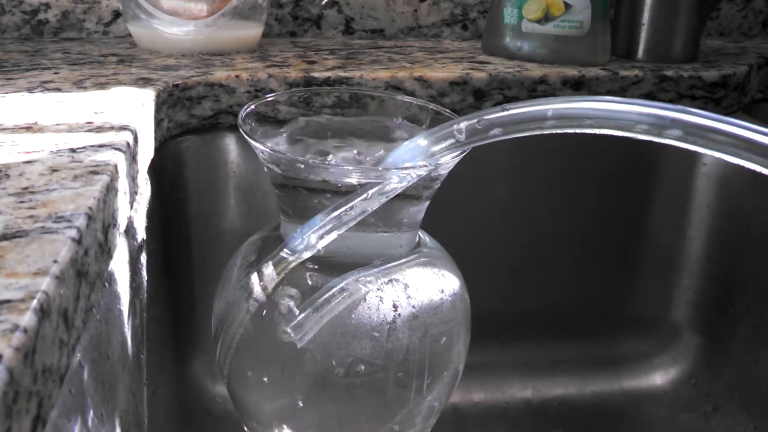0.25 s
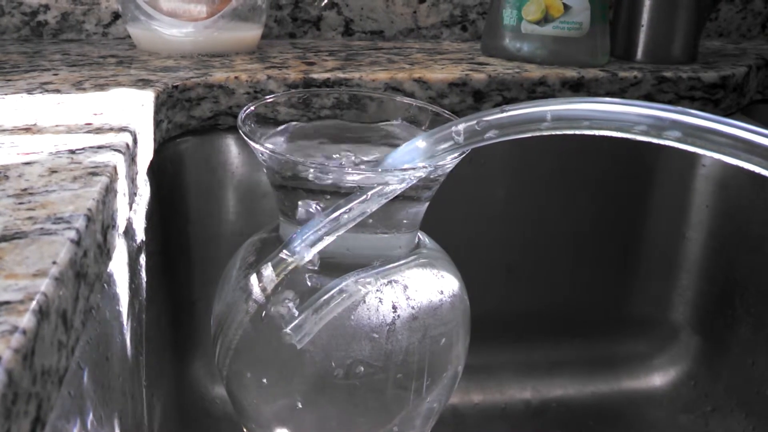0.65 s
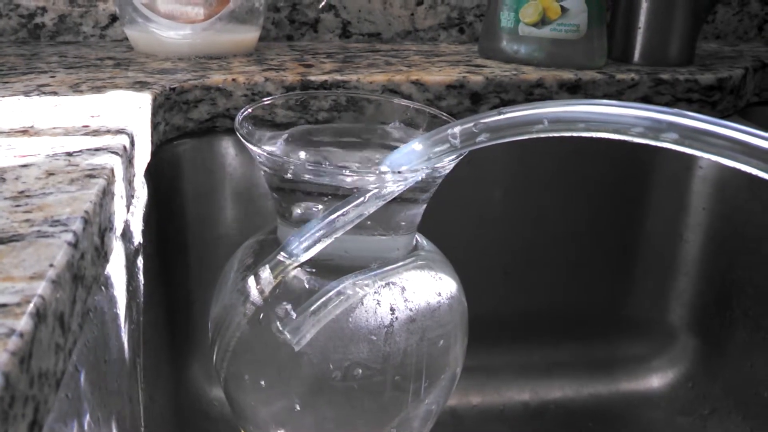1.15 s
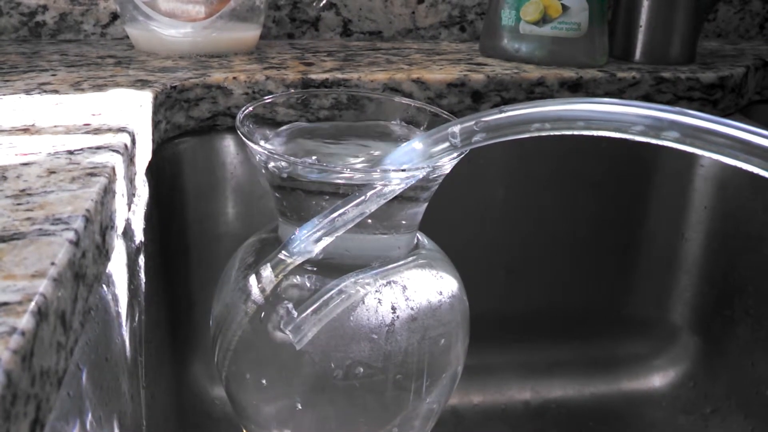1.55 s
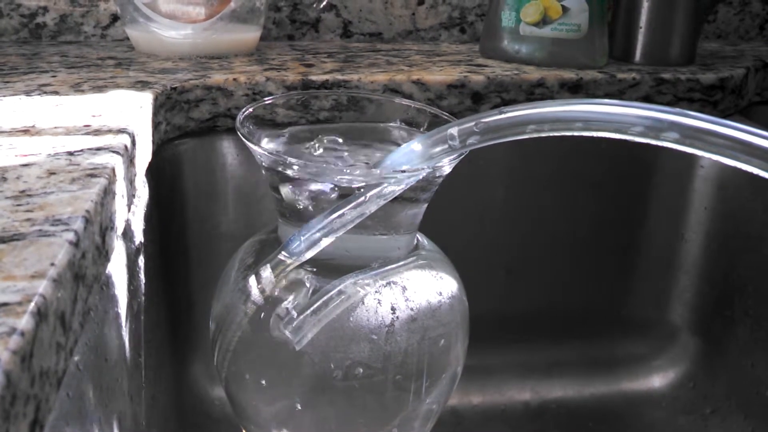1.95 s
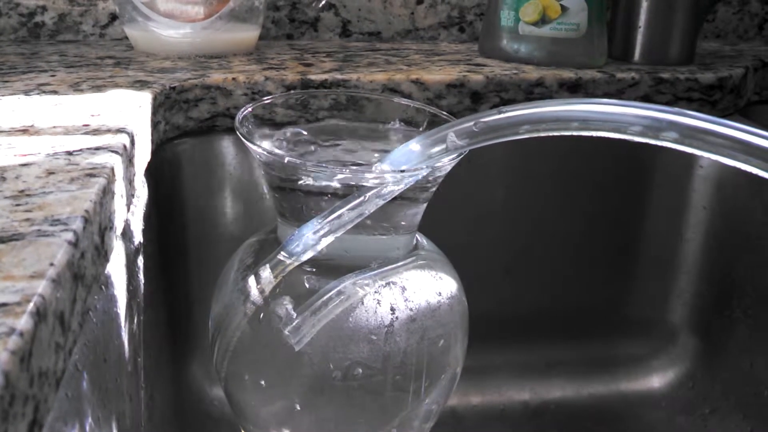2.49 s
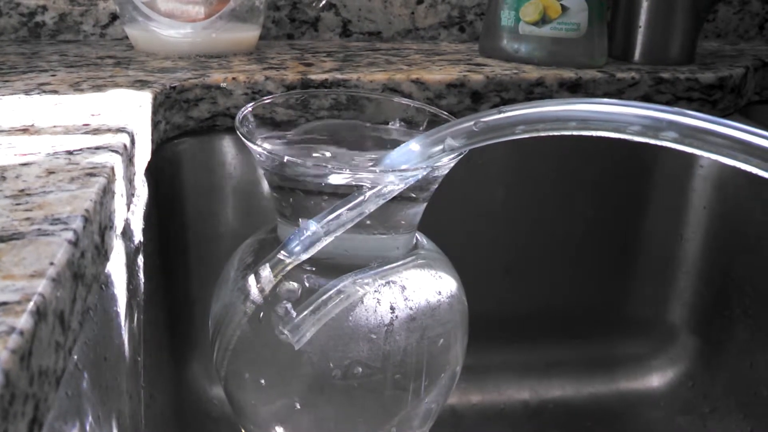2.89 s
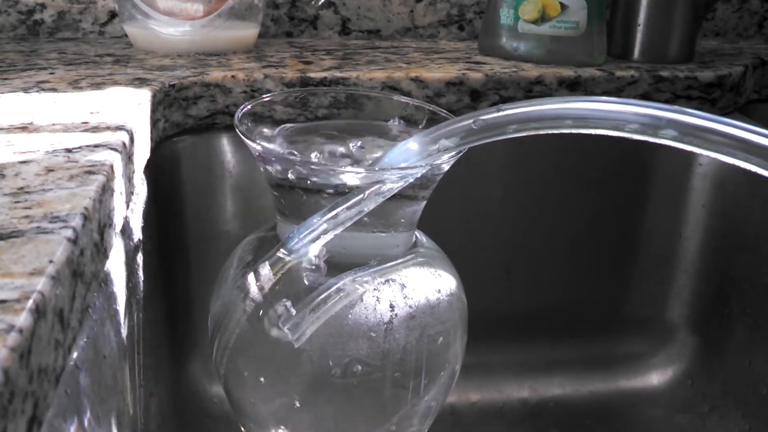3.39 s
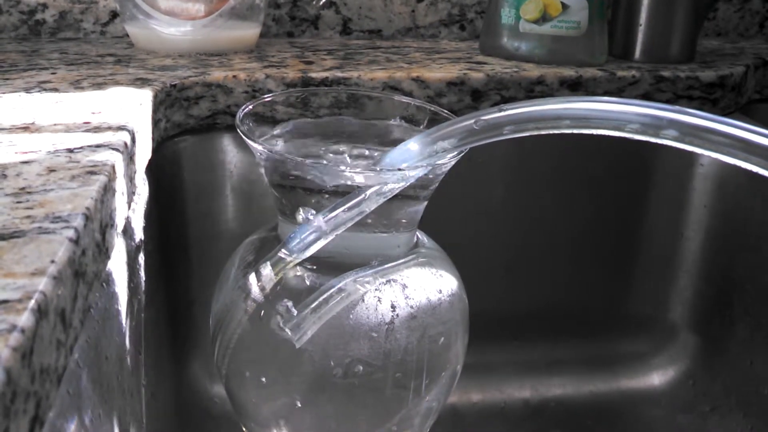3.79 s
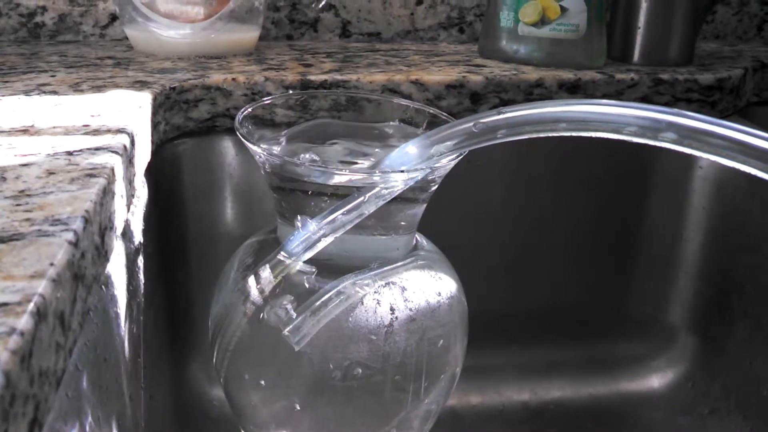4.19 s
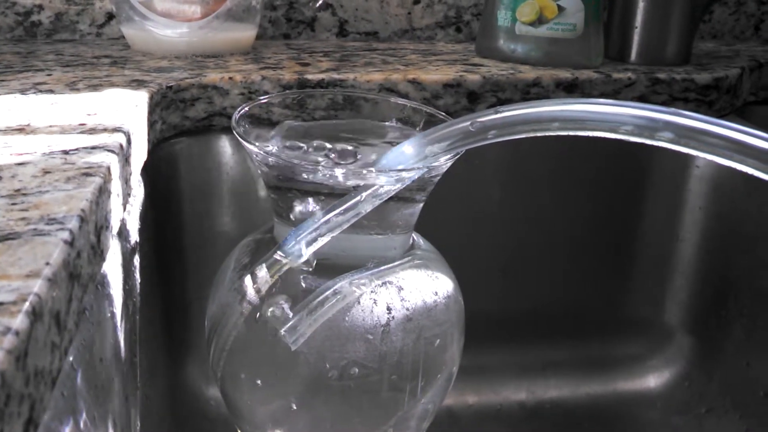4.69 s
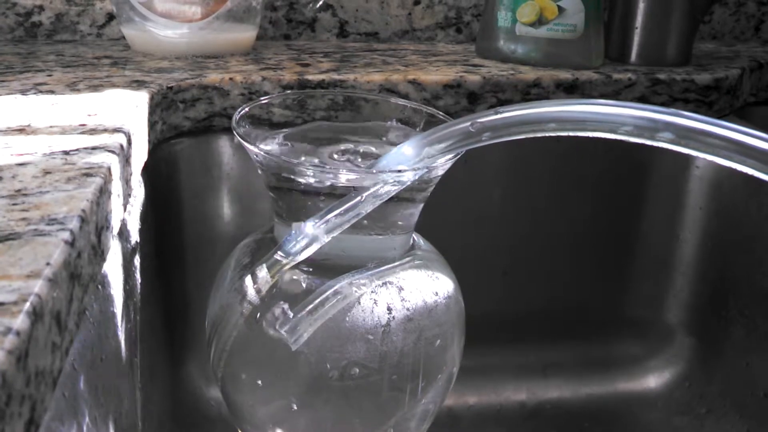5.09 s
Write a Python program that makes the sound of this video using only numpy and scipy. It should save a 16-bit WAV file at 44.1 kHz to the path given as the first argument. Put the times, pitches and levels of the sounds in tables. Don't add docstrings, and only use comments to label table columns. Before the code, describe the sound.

The sound opens quietly and rises evenly to full level by about 1.8 seconds, then stays constant to the end near 5.5 seconds. A bass-heavy appliance drone dominates, centred around 118 Hz and throbbing about four times a second, with a mid whirr near 500 Hz and a soft, dark fan roar. Over it, gas bubbles burst in a water-filled glass vase: very short, dry, bright ticks with a wet, glassy edge and a brief steel-basin ring. Faint pops come at 0.15, 0.3, 0.6, 0.9 and 1.2 seconds. Busy clusters follow at 2.0 to 2.35, a strong click at 2.8, another cluster at 3.3 to 3.4 with a lower plip, and sharp pops at 3.6 to 4.0, the strongest near 3.8. Isolated ticks fall at 4.4 and 5.0; then only the drone remains. Close stereo microphone, pops left of centre, slight hiss.

```python
import sys
import numpy as np
from scipy import signal
from scipy.io import wavfile
from scipy.ndimage import uniform_filter1d

SR = 44100
rng = np.random.default_rng(int(sys.argv[2]) if len(sys.argv) > 2 else 0)


def volts_from_db(level):
    exponent = np.asarray(level, float) / 20
    return 10 ** exponent


def waveform_to_disk(signal):
    frames = np.transpose(np.atleast_2d(signal))
    scaled = np.clip(frames, -1, 1) * 32767
    samples = np.round(scaled).astype(np.int16)
    wavfile.write(sys.argv[1], SR, samples)


N = 235658


def evened(x):
    return x / np.sqrt(np.mean(x ** 2) + 1e-20)


def read(points, hz):
    f, *columns = np.transpose(points)
    return [np.interp(np.log(hz + 1), np.log(f + 1), c) for c in columns]


def drift(top_hz, count):
    t = np.arange(N // 256 + 2) * 256 / SR
    hz = np.geomspace(0.1, top_hz, num=16)[:, None]
    turns = rng.random((count, len(hz), 1))
    sines = np.sin(2 * np.pi * (hz * t + turns)) / np.sqrt(hz)
    slow = evened(sines.sum(1))
    return np.array([np.interp(np.arange(N) / SR, t, row) for row in slow])


def late(x, count):
    silence = np.zeros(x.shape[:-1] + (count,))
    return np.concatenate([silence, x[..., :-count]], axis=-1)


def ports(common, difference):
    return np.array([common + difference, common - difference])


SHAFT_HZ, PUMP_HZ, BUZZ_HZ, BLADE_HZ = 58.92, 115.61, 120.05, 508.67
# multiple of the fundamental, level in dB common to
# both ports, port difference in dB relative to it, phase of the difference in rad.
SHAFT_TONES = [(1, -38.0, -15.5, -0.25), (5, -47.4, -14.5, 2.92), (6, -37.5, -24.2, 1.48),
               (7, -46.3, -21.3, -1.0), (63, -80.0, -3.4, -0.95), (64, -85.2, 0.2, -1.76),
               (65, -85.6, -10.1, 2.77), (98, -77.6, 3.6, -0.94), (100, -89.0, -0.6, -1.15),
               (113, -87.9, -10.9, -1.5), (141, -89.3, -1.0, -1.45), (212, -91.1, -15.0, 2.73),
               (214, -90.8, -9.6, 2.05), (215, -89.6, -0.1, 2.85)]
PUMP_TONES = [(1, -30.5, -17.3, 0.07), (2, -50.4, -9.8, -0.23), (3, -51.7, -14.7, -1.26)]
BUZZ_TONES = [(1, -34.2, -17.9, -0.27), (2, -49.8, -15.7, -2.79), (3, -52.9, -6.9, -0.24)]
# multiple of the blade rate, buzz sideband number, level in dB,
# port difference in dB, phase of the difference in rad.
BLADE_TONES = [(1, -1, -45.0, -16.4, 1.71), (1, 0, -31.1, -12.8, -0.22), (1, 1, -56.3, -14.2, -2.66),
               (1, 2, -52.6, -6.1, -0.67), (2, -1, -64.5, -6.5, -1.96), (2, 1, -62.6, 1.9, -1.45)]
# frequency in Hz, level in dB, port difference in dB, its phase in rad.
STRAY_TONES = [(170.32, -46.9, -7.3, -1.29), (218.29, -48.7, -19.1, -0.68), (340.66, -49.2, -23.5, -0.74),
               (469.9, -49.8, -12.3, -1.33), (485.55, -50.2, -10.0, 0.01), (615.4, -54.8, -21.6, -1.55),
               (3262.28, -79.0, 2.7, 2.0), (6005.07, -87.4, -5.9, 3.06), (13999.3, -87.1, 4.6, -1.55)]


def tones():
    stacks = [(PUMP_HZ, PUMP_TONES[:1]), (BUZZ_HZ, BUZZ_TONES), (PUMP_HZ, PUMP_TONES[1:]),
              (SHAFT_HZ, SHAFT_TONES), (1, STRAY_TONES)]
    rows = [(k * hz, *rest) for hz, stack in stacks for k, *rest in stack]
    return rows + [(k * BLADE_HZ + side * BUZZ_HZ, *rest) for k, side, *rest in BLADE_TONES]


def motors(waver=0.02, wander_rad=0.15, beat_s=-0.01):
    hz, db, apart_db, apart = np.transpose(tones())[..., None]
    start = 2 * np.pi * rng.random(hz.shape)
    wobble = wander_rad * (1 + hz / 5000) * drift(6.8, count=len(hz))
    start[1], wobble[1] = start[0], wobble[0]
    angle = 2 * np.pi * hz * (np.arange(N) / SR - beat_s) + start + wobble
    angle = (angle % (2 * np.pi)).astype(np.float32)
    size = np.sqrt(2) * volts_from_db(db) * (1 + waver * drift(7.3, count=len(hz)))
    common = size * np.cos(angle)
    difference = size * volts_from_db(apart_db) * np.cos(angle + apart.astype(np.float32))
    return ports(common.sum(0), difference.sum(0))


# frequency in Hz, common level in dB, port difference in dB,
# likeness of the two from 0 to 1, phase of the difference in rad.
ROAR_SPECTRUM = [(30, -66, -27, 0, -3), (80.4, -59, -18, 0.3, 0.5), (150, -59.5, -15.5, 0.3, -2.5),
                 (240, -60.5, -11, 0.46, 0), (440, -62.5, -10.5, 0, 3.5), (648, -66.5, -7.5, 1, -0.5),
                 (853, -75, -6.5, 0.34, 0.5), (1326, -84.5, 2, 0.3, -1.5), (2210, -82.5, 0, 0.38, 3),
                 (3160, -88.5, -1.5, 0, -3), (5280, -101.3, 1.5, 0, -6.5), (8200, -104.0, 1, 0.6, 1),
                 (10900, -106.9, -2.5, 1, -2.3), (15200, -104.0, 4, 0.19, 7.5)]
# frequency in Hz, width in Hz, height in dB.
ROOM_MODES = [(212.7, 26.5, 6.5), (346, 14, 5.5), (603.6, 23, 5.5), (1018, 83, 4), (1194, 57, 6.5),
              (1350, 53, 4), (1530, 26, 4.5), (3940, 210, -4.5), (6800, 490, -1), (10200, 870, -2.5)]


def roar(level_db=14.5, patchy_db=0.61, ripple_db=1.64):
    frames, hz = N // 512 + 5, np.fft.rfftfreq(2048, 1 / SR)
    a, b, c, d, patches = rng.standard_normal((frames, 1025, 5)).T
    patches = uniform_filter1d(patches, size=16, axis=0)
    patches = evened(uniform_filter1d(patches, size=8, axis=1))
    db, apart_db, same, apart = (v[:, None] for v in read(ROAR_SPECTRUM, hz))
    ripple = evened(uniform_filter1d(rng.standard_normal(len(hz)), size=2))
    modes = sum(peak / (1 + (2 * (hz - f) / width) ** 2) for f, width, peak in ROOM_MODES)
    db = db + (ripple_db * ripple + modes)[:, None]
    same = np.clip(same, 0, 1)
    common, unrelated = a + 1j * b, c + 1j * d
    difference = same * common * np.exp(1j * apart) + np.sqrt(1 - same ** 2) * unrelated
    z = ports(common, volts_from_db(apart_db) * difference) * volts_from_db(db + level_db + patchy_db * patches)
    return signal.istft(z, nperseg=2048, noverlap=1536)[1][:, :N]


def bubble(t, hz, cycles, glide):
    u = t * hz / cycles
    swell_and_decay = (1 - np.exp(-u * 3.9)) * np.exp(-u)
    return swell_and_decay * np.sin(2 * np.pi * hz * (t + glide * t ** 2))


def pop(hz, db, span, tear_db, spray, bubble_db=2.0, film_db=12.0, cycles=4.3, glide=2.2, tear_s=0.00063):
    t = np.arange(len(spray)) / SR
    rings = sum(volts_from_db(d) * bubble(t, f, cycles, glide) for f, d in zip(hz, db))
    band = [0.6 * min(span), min(2.1 * max(span), 18000)]
    high = signal.butter(2, band, "band", fs=SR, output="sos")
    tear = signal.sosfilt(high, spray) * np.exp(-t / tear_s)
    return volts_from_db(bubble_db) * rings + volts_from_db(tear_db + film_db) * tear


# start in seconds, bubble in Hz, its level in dB,
# second bubble in Hz, film snap in dB.
LARGE_POPS = [(0.145, 9090, -34, 15030, -43), (0.285, 9910, -33, 13390, -52.5),
              (0.911, 3740, -31.5, 9170, -71), (1.219, 14400, -24, 8200, -41.5),
              (2.0065, 6700, -27, 11600, -56), (2.071, 9000, -27, 6800, -45),
              (2.165, 14900, -22, 10700, -52), (2.3378, 6800, -28.5, 11020, -49),
              (2.346, 9250, -27.5, 14300, -43), (2.804, 11000, -21.5, 8500, -45),
              (3.2878, 8900, -32, 14430, -42), (3.3173, 15100, -26, 12750, -52),
              (3.36, 3060, -26.5, 10900, -73), (3.639, 13300, -31, 15930, -66),
              (3.7427, 4320, -33.5, 11240, -46), (3.778, 8550, -21, 12200, -41.5),
              (3.8126, 6060, -33, 9390, -65), (4.0083, 8500, -30, 11370, -54),
              (4.015, 8460, -26.5, 15200, -49), (4.3865, 14900, -29, 13050, -54)]
# start in seconds, bubble in Hz, its level in dB, film snap in dB.
SMALL_POPS = [(0.153, 10200, -44, -58), (0.2711, 5120, -44, -57), (0.5712, 10160, -44, -56),
              (0.5803, 8040, -38, -55), (0.5987, 9900, -42, -52), (1.8801, 6760, -47, -62),
              (1.923, 5230, -44.5, -50), (2.2266, 14690, -45.5, -50), (2.2926, 13950, -40, -51.5),
              (2.3254, 8480, -41, -51), (2.5925, 13480, -47, -51.5), (3.2772, 15200, -46, -60),
              (3.309, 5700, -32, -61), (3.3705, 4080, -37, -60), (3.432, 9250, -39, -64),
              (3.8687, 5640, -45, -66), (4.0001, 15370, -48, -67), (4.997, 15200, -52.5, -49.5),
              (5.0013, 14940, -37, -58)]
SECOND_DB = 11.5
SMALL_SPRAY_HZ = (7000, 12000)


def pops():
    out = np.zeros(N + 600)
    sprays = rng.standard_normal((len(LARGE_POPS) + len(SMALL_POPS), 600))
    large = [(s, (hz, hz2), (db, tear + SECOND_DB), (hz, hz2), tear) for s, hz, db, hz2, tear in LARGE_POPS]
    small = [(s, (hz,), (db,), (hz, *SMALL_SPRAY_HZ), tear) for s, hz, db, tear in SMALL_POPS]
    for (s, *row), spray in zip(large + small, sprays):
        at = round((s - 0.0004) * SR)
        out[at:at + 600] += pop(*row, spray)
    direct = out[:N]
    neck = [(49, 0.8), (92, -0.45), (139, 0.25)]
    return direct + sum(share * late(direct, count=wait) for wait, share in neck)


# frequency in Hz, time to fall by 60 dB in seconds.
SINK_DECAY = [(3000, 0.064), (8000, 0.039), (15000, 0.086)]


def sink(x, gap=225):
    taps = np.zeros((2, SR // 2))
    at = np.arange(gap, SR // 2 - 20, 20)
    at = at + rng.integers(0, 20, (2, len(at)))
    np.put_along_axis(taps, at, rng.choice([-1., 1.], at.shape), 1)
    hz, t, z = signal.stft(taps, SR, nperseg=128)
    t60 = read(SINK_DECAY, hz)[0][:, None]
    tail = signal.istft(z * volts_from_db(-60 * t / t60), SR, nperseg=128)[1]
    return signal.fftconvolve(x[None], tail / np.linalg.norm(tail[0]), axes=1)[:, :N]


# start in seconds, length in seconds, change in dB.
DUCKS = [
    (2.06, 0.25, -0.36),
    (3.363, .13, -1),
]


def gain_control(low=0.21, start=0.098, per_s=0.5, full_db=0.11):
    t = np.arange(N) / SR
    ducks = sum(db * ((t > s) & (t < s + length)) for s, length, db in DUCKS)
    opening = np.clip(start + per_s * t, low, 1)
    return opening * volts_from_db(full_db + uniform_filter1d(ducks, size=600))


def scene():
    water = pops()
    direct = np.array([water, volts_from_db(-31.0) * late(water, count=3)])
    return direct + volts_from_db(-10.0) * sink(water) + motors() + roar()


def low_pass(x):
    return signal.sosfilt(signal.butter(12, 16810, fs=SR, output="sos"), x)


def record(dry, port_lag=16, edge_hz=15560):
    hiss = volts_from_db(-74.0) * rng.standard_normal(dry.shape)
    rumble_cut = signal.butter(2, 38.0, "high", fs=SR, output="sos")
    both = signal.sosfilt(rumble_cut, dry * gain_control() + hiss)
    crossed = both - 0.94 * late(both[::-1], count=port_lag)
    crossed = crossed * volts_from_db(np.array([[-0.6], [0.6]]))
    edge = signal.firwin(701, edge_hz, window=("kaiser", 7), fs=SR)
    inside = signal.oaconvolve(crossed, edge[None], "same")
    above = crossed - inside
    power = uniform_filter1d((above ** 2).mean(0), size=200)
    opened = uniform_filter1d(1. * (power > 12 * np.median(power)), size=100)
    return low_pass(inside + volts_from_db(-21.0) * opened * above)


dry = scene()
out = record(dry)
waveform_to_disk(out)
```